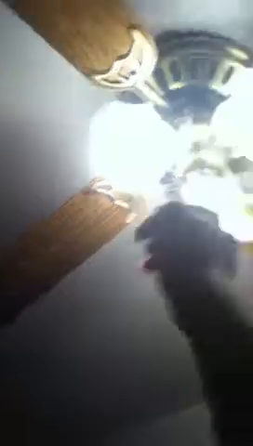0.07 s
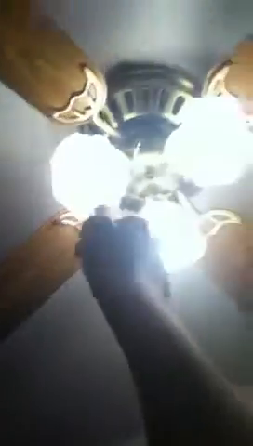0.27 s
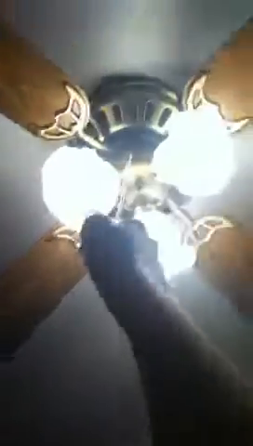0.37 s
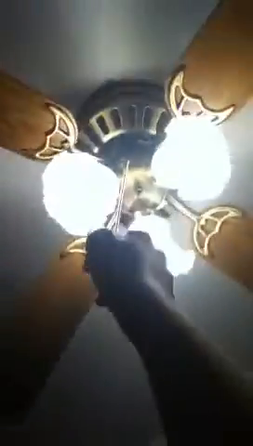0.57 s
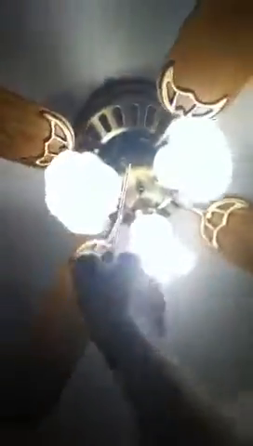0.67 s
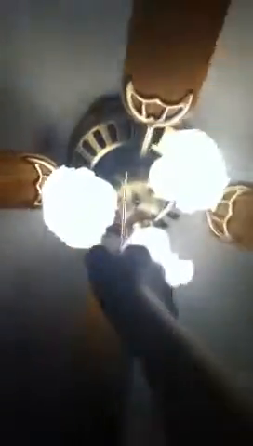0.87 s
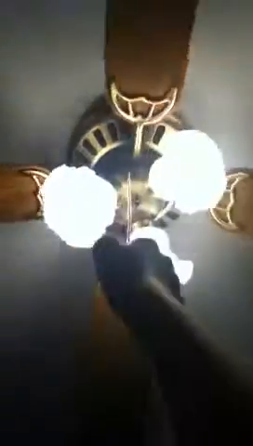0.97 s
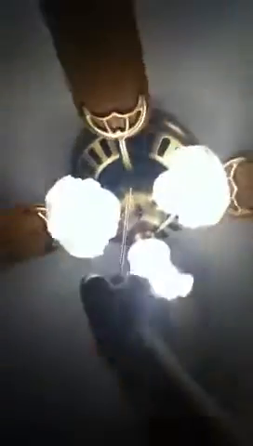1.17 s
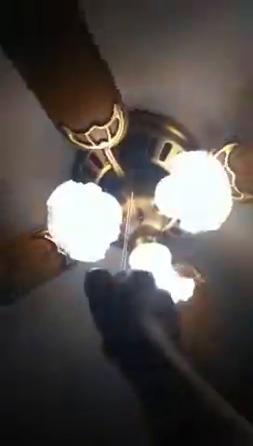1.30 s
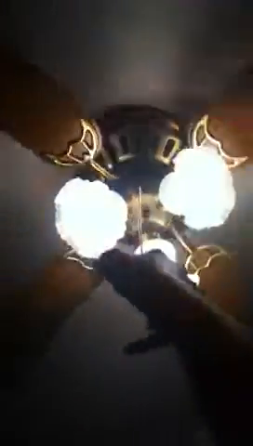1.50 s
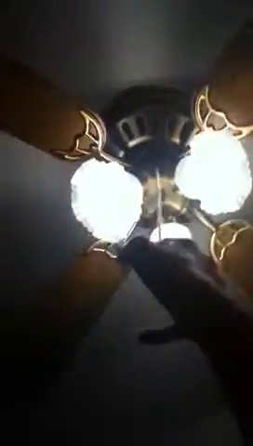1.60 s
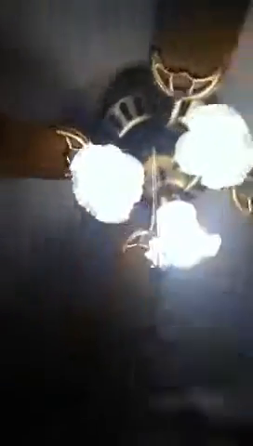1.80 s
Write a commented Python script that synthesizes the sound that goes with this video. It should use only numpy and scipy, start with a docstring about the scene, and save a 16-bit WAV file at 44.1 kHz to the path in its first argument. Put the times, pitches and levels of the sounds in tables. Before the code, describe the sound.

Pull-chain switch tugged and released three times with sharp metal clicks, a fan droning softly.

```python
"""A ceiling fan's pull-chain switch is tugged three times in a small, quiet room.
On each pull the chain ticks, the ratchet (a toothed wheel) snaps over and the fan body thumps.
On each release the chain ticks back brightly and the spring clacks against its stop.
Snaps and clacks set the lamp housing ringing, and the slack chain jingles faintly.
Underneath, the fan drones and stirs the air, and the motor's hum changes with each setting."""
import sys
import numpy as np
from scipy import signal
from scipy.fft import rfft, irfft, next_fast_len
from scipy.io import wavfile
from scipy.ndimage import uniform_filter1d, map_coordinates

SR = 44100
rng = np.random.default_rng(int(sys.argv[2]) if len(sys.argv) > 2 else 0)


def pcm_store(signal):
    """Save signal as 16-bit PCM."""
    levels = np.round(np.clip(np.atleast_2d(signal), -1, 1) * 32767)
    wavfile.write(sys.argv[1], SR, levels.astype(np.int16).T)


N = 81585
T = np.arange(SR // 2) / SR  # half a second of time for one short sound


def amp(db):
    """Turn decibels into a gain."""
    return 10 ** (np.asarray(db) / 20)


def fade(t60):
    """Die away by 60 dB in t60 seconds, the fade time."""
    return amp(-60 * T / t60)


def along(points, hz):
    """Read between (frequency, value) points on a log scale."""
    f, v = np.transpose(points)
    return np.interp(np.log(hz + 1), np.log(f + 1), v)


def wobble(rate):
    """A smooth curve through `rate` random points a second."""
    points = rng.standard_normal(int(N * rate / SR) + 4)
    return map_coordinates(points, [np.arange(N) * rate / SR])


def add(track, s, sound):
    """Mix a sound into the track at s seconds."""
    part = track[round(s * SR):][:len(sound)]
    part += sound[:len(part)]


def coloured(x, colour):
    """Turn each frequency up or down as the colour table says."""
    m = 2 * next_fast_len(len(x))
    cepstrum = irfft(np.log(amp(along(colour, np.fft.rfftfreq(m, 1 / SR)))))
    cepstrum[1:m // 2] *= 2
    cepstrum[m // 2 + 1:] = 0  # so nothing rings before the hit
    return irfft(rfft(x, m) * np.exp(rfft(cepstrum)), m)[:len(x)]


def noise(colour, size):
    """Coloured noise with an average (rms) level of 1."""
    x = coloured(rng.standard_normal(size), colour)
    return x / np.sqrt(np.mean(x ** 2) + 1e-20)


def ring(notes, attack_s=0.00015):
    """A struck part's fading notes, a little different each time."""
    chance = rng.standard_normal((len(notes), 2))
    tones = sum(amp(db + nudge_db) * fade(t60) * np.sin(2 * np.pi * (hz * T + phase))
                for (hz, db, t60), (nudge_db, phase) in zip(notes, chance))
    return tones * (1 - np.exp(-T / attack_s))


# how long the room echoes: f/Hz, fade time/s
ROOM_FADE = [(300, 0.65), (1500, 0.17), (5000, 0.17), (9000, 0.15), (15000, 0.11)]
def room(x, echo_db, early_db=-5.5, tail_db=-7.5, rise_s=0.0037):
    """Add quick echoes from ceiling and blades, then the room's tail."""
    hz, t, spectrum = signal.stft(rng.standard_normal(len(T)), SR, nperseg=256)
    decay = amp(-60 * t / along(ROOM_FADE, hz)[:, None])
    tail = signal.istft(spectrum * decay, SR)[1][:len(T)]
    tail *= 1 - np.exp(-T / rise_s)
    early = rng.standard_normal(len(T)) * fade(t60=0.043)
    echoes = amp(early_db) * early / np.linalg.norm(early) + amp(tail_db) * tail / np.linalg.norm(tail)
    return x + amp(echo_db) * signal.fftconvolve(x, echoes)[:len(x)]


def clicks(rows, colour, notes, hold_s, fade_s, scrape_db, ring_db, echo_db):
    """Metal meets metal: a swelling scrape, a brief chatter and a short ring."""
    out = np.zeros(N)
    lead = int(.004 * SR) + 1  # the scrape starts 4 ms early
    scrape = amp(scrape_db) * fade(t60=0.0091)[:lead][::-1]
    chatter = amp(-60 * np.maximum(T - hold_s, 0) / fade_s)
    shape = np.concatenate([scrape, chatter])
    for s, db, middle_db, top_db, *_ in rows:
        crack = coloured(rng.standard_normal(len(shape)) * shape, colour)
        crack *= np.linalg.norm(shape) / np.linalg.norm(crack)
        ringing = amp(ring_db) * np.pad(ring(notes), (lead, 0))
        hit = room(crack + ringing, echo_db)
        tone = [(370, 0), (2940, middle_db), (7650, 0), (12700, top_db)]  # f/Hz, boost/dB
        add(out, s - lead / SR, amp(db) * coloured(hit, tone))
    return out


# hum at each switch setting: start t/s, low note level/dB, octave level/dB
HUM_STEPS = [(0, -72, -72), (.235, -59, -60), (.768, -64, -64), (1.279, -69, -60)]
# notes of the turning fan: f/Hz, level/dB
DRONE_NOTES = [(146, -68.5), (183, -70)]
# colour of the moving air: f/Hz, level/dB
AIR_COLOUR = [(25, -21.5), (55, -7), (95, -2), (170, -3), (290, -4.5), (450, -8.5), (800, -14.5),
              (1500, -17), (3200, -20.5), (6000, -22.5), (8000, -22), (12000, -24.5), (15500, -29)]
def running_fan(hum_hz=119.05, settle_s=0.014, air_db=-58.5):
    """Mains hum steps with the switch, over a wavering drone and moving air."""
    t = np.arange(N) / SR
    starts, *levels = np.transpose(HUM_STEPS)
    setting = np.searchsorted(starts[1:], t)
    hum = drone = 0
    for harmonic, db in enumerate(levels, 1):
        gain = uniform_filter1d(amp(db[setting]), int(settle_s * SR))
        hum += gain * amp(2.5 * wobble(4.4)) * np.sin(2 * np.pi * harmonic * hum_hz * t)
    for hz, db in DRONE_NOTES:
        drone += amp(db + 3 * wobble(7.8)) * np.sin(2 * np.pi * hz * t + 2.6 * wobble(9))
    air = amp(air_db - 2.5 * wobble(11.85)) * noise(AIR_COLOUR, N)
    return np.sqrt(2) * (hum + drone) + air


# ticks of the pulled chain: t/s, level/dB, middle boost/dB, top boost/dB
PULL_TICKS = [(.1467, -40.5, 4, -2), (.1845, -40, 4, 1), (.2152, -36.5, -16, -2), (.2243, -32, 5.5, -17),
              (.6893, -39.5, 3.5, -5), (.7191, -38, 2, -1), (.7571, -31.5, -2, -19),
              (1.2131, -37.5, -1, -6), (1.2466, -29, -6, -5.5), (1.2683, -30, 0.5, -12)]
# their colour: f/Hz, level/dB
PULL_COLOUR = [(150, -14), (500, -9), (700, -13), (1100, -2), (1450, -6), (2400, 0), (3200, -5), (4400, -5),
               (5000, -10), (6900, -7), (7700, -1), (10500, -11), (15500, -22)]
# their ring: f/Hz, level/dB, fade time/s
PULL_NOTES = [(1070, -22, .08), (1240, -20, .08), (2370, -18, .05), (2705, -18, .13), (4290, -18, .04),
              (7480, -13, .03), (9600, -18, .025)]
def chain_pull():
    """The chain ticks as it is pulled down."""
    return clicks(PULL_TICKS, PULL_COLOUR, PULL_NOTES,
                  hold_s=0.00054, fade_s=0.031, scrape_db=-13.5, ring_db=3.5, echo_db=3)


# ratchet snaps: t/s, level/dB, middle boost/dB, top boost/dB, housing ring/dB
SNAPS = [(.2302, -18.5, 1, 2.5, -19.5), (0.7645, -18.5, 3.5, -4, -17.5), (1.2757, -20, -1, 1, -21)]
# their colour: f/Hz, level/dB
SNAP_COLOUR = [(40, -36), (150, -20), (300, -15), (480, -21), (900, -14), (1700, -6), (3000, -5),
               (4300, -2), (5200, -6), (8000, 0), (10000, -1), (11000, -9), (15500, -19)]
# their ring: f/Hz, level/dB, fade time/s
SNAP_NOTES = [(1064, -16, .075), (1700, -23, .06), (2390, -12, .05), (2705, -18, .09), (3490, -15, .04),
              (4290, -7, .045), (6450, -11, .025), (7700, -11, .03), (9750, -9, .02)]
def ratchet():
    """The ratchet snaps over to the next setting."""
    return clicks(SNAPS, SNAP_COLOUR, SNAP_NOTES,
                  hold_s=0.00074, fade_s=0.018, scrape_db=-22, ring_db=-3.5, echo_db=0.5)


# long ring of the lamp housing and shades: f/Hz, level/dB, fade time/s
HOUSING_NOTES = [(2444, -29, .38), (2704, -26, .24), (2765, -33, .28), (2918, -36, .27), (3235, -33, .3),
                 (3415, -33, .17), (5488, -36, .2)]
def lamp_housing(hits, treble_hz=6740):
    """Each hard hit starts with a bright spit and leaves the housing ringing faintly."""
    out = np.zeros(N)
    treble = signal.butter(2, treble_hz, "highpass", fs=SR, output="sos")
    for s, db, _, top_db, ring_db in hits:
        spit = signal.sosfilt(treble, noise(SNAP_COLOUR, len(T)) * fade(t60=0.0073))
        add(out, s, amp(db + top_db - 1) * spit + amp(ring_db) * ring(HOUSING_NOTES))
    return out


# jolts to the fan body: t/s, level/dB
THUMPS = [(0.239, -41.5), (0.769, -34), (1.272, -40)]
# its low notes: f/Hz, level/dB, fade time/s
BODY_NOTES = [(92, -7, .12), (118, -2, .17), (151, 0, .26), (245, -14, .12)]
def fan_body():
    """Each snap jolts the hanging fan into a low thump."""
    out = np.zeros(N)
    for s, db in THUMPS:
        add(out, s, amp(db) * ring(BODY_NOTES, attack_s=0.0054))
    return out


# ticks of the released chain: t/s, level/dB, middle boost/dB, top boost/dB
RETURN_TICKS = [(.4345, -30, 1, 4.5), (.4511, -31, 2, -1), (.4588, -37, 4, 3), (.9999, -28.5, -0.5, 0.5),
                (1.0163, -28, 3.5, -10), (1.5074, -31, 4, 1), (1.5229, -26, -1.5, -3), (1.5435, -39, 2, 4),
                (1.5517, -38.5, 19, 8), (1.5555, -48, 12, 5)]
# their colour: f/Hz, level/dB
RETURN_COLOUR = [(200, -23), (700, -19.5), (1200, -8), (1900, -9), (2900, -15), (3900, -17.5), (4600, -6.5),
                 (5900, -17.5), (6900, -6), (7700, 3.5), (9000, -13), (9800, -2.5), (11000, -27),
                 (15500, -29)]
# their ring: f/Hz, level/dB, fade time/s
RETURN_NOTES = [(2400, -18, .035), (4360, -10, .04), (5120, -15, .025), (7470, -5, .03), (8040, -13, .03),
                (9560, -10, .022), (11540, -19, .02)]
def chain_return():
    """The chain ticks brightly as it runs back."""
    return clicks(RETURN_TICKS, RETURN_COLOUR, RETURN_NOTES,
                  hold_s=0.0033, fade_s=.015, scrape_db=-19, ring_db=2, echo_db=1)


# spring clacks: t/s, level/dB, middle boost/dB, top boost/dB, housing ring/dB
CLACKS = [(0.4626, -20, 2, 1.5, -18), (1.0280, -21.5, 1.5, 0.5, -22.5), (1.5338, -20, -6.5, 4, -19.5)]
# their colour: f/Hz, level/dB
CLACK_COLOUR = [(150, -21), (550, -17), (900, -16), (1100, -2.5), (1900, 4.5), (2400, 2), (3100, -4),
                (5000, -2.5), (6300, -4), (8600, -0.5), (10100, 1), (11300, -11), (15500, -21)]
# their ring: f/Hz, level/dB, fade time/s
CLACK_NOTES = [(1065, -20, .1), (1240, -15, .1), (1580, -22, .1), (2075, -20, .1), (2326, -12, .07),
               (2705, -18, .09), (4290, -11, .055), (7420, -12, .045), (9900, -12, .025)]
def spring():
    """The spring clacks against its stop."""
    return clicks(CLACKS, CLACK_COLOUR, CLACK_NOTES,
                  hold_s=0.00052, fade_s=0.025, scrape_db=-41, ring_db=-1.5, echo_db=-0.5)


# jingles of the slack chain: t/s, level/dB
JINGLES = [(0.951, -47), (1.623, -47), (1.802, -51)]
# their colour: f/Hz, level/dB
JINGLE_COLOUR = [(1000, -10), (4000, -13), (5700, -4.5), (8500, -4), (11000, -8), (16000, -25)]
def slack_chain(rise_s=.009):
    """Beads brush each other in short, soft jingles."""
    out = np.zeros(N)
    shape = np.minimum(T / rise_s, 1) * fade(t60=.15)
    for s, db in JINGLES:
        add(out, s, amp(db) * noise(JINGLE_COLOUR, len(T)) * shape)
    return out


def scene():
    """Everything, heard from just below the fan."""
    switch = chain_pull() + ratchet() + chain_return() + spring()
    return (switch + lamp_housing(SNAPS + CLACKS) + fan_body() + slack_chain() + running_fan())[None]


def record(dry):
    """Cut away the very highest treble."""
    top_hz = 15850
    m = next_fast_len(N + SR // 2)
    kept = np.fft.rfftfreq(m, 1 / SR) < top_hz
    return irfft(rfft(dry, m) * kept, m)[:, :N]


dry = scene()
out = record(dry)
pcm_store(out)
```